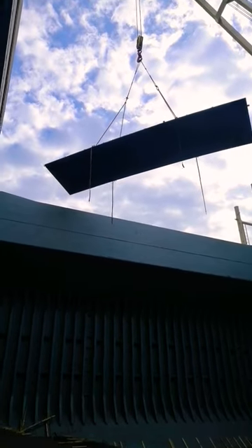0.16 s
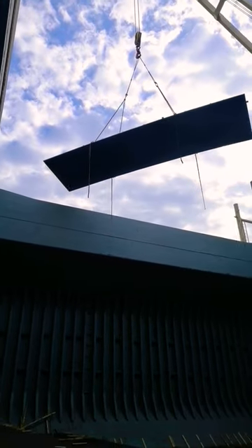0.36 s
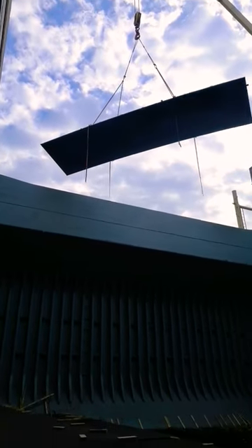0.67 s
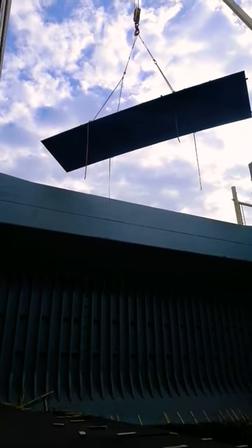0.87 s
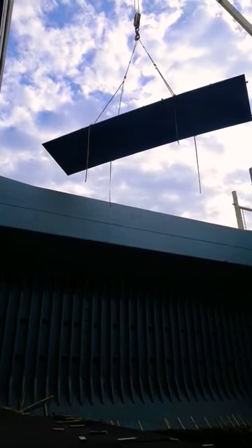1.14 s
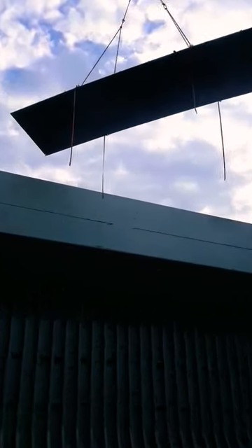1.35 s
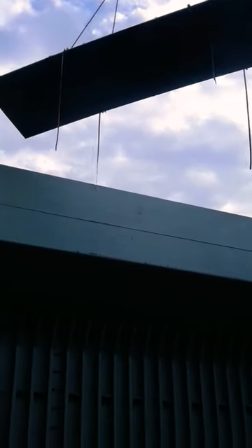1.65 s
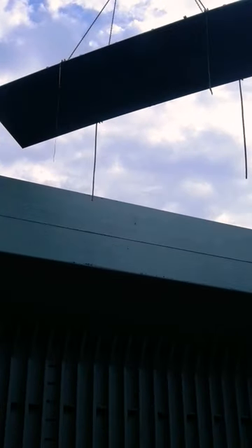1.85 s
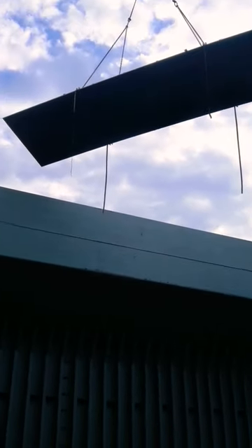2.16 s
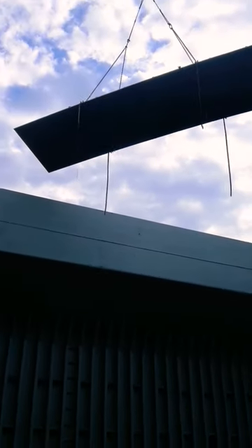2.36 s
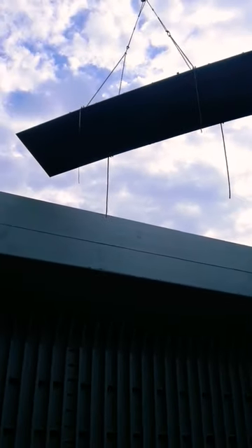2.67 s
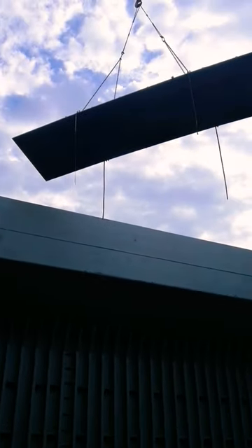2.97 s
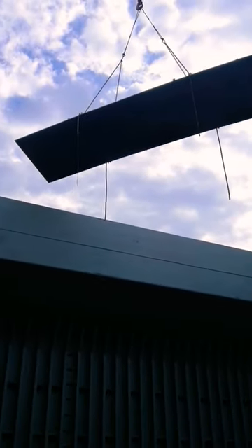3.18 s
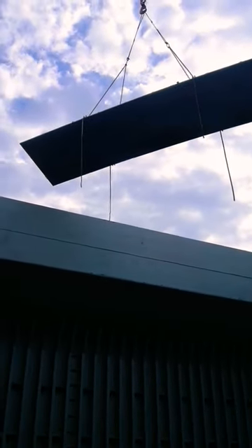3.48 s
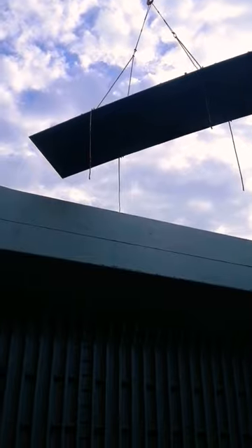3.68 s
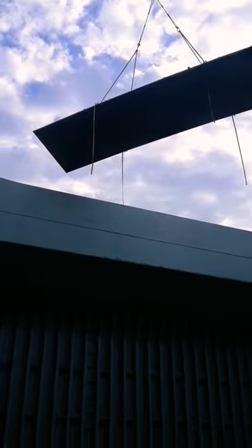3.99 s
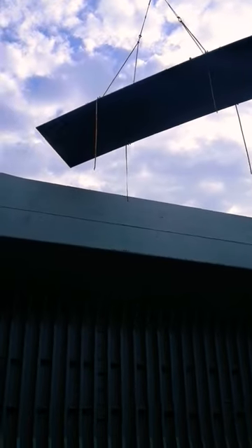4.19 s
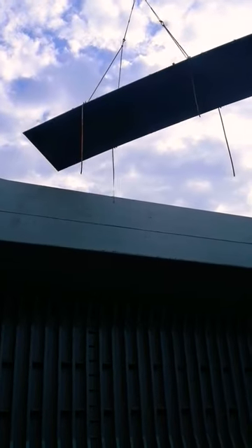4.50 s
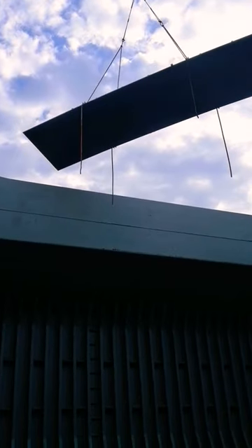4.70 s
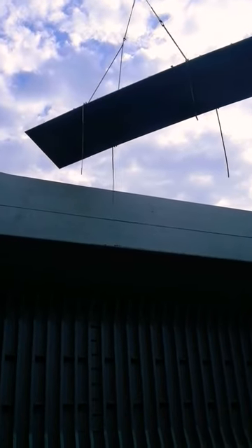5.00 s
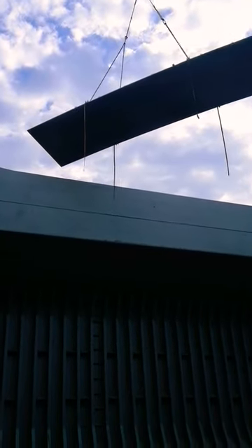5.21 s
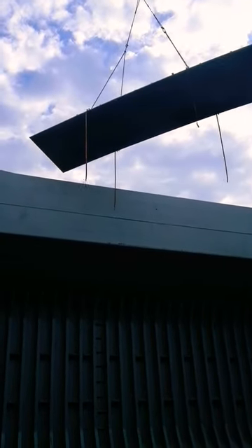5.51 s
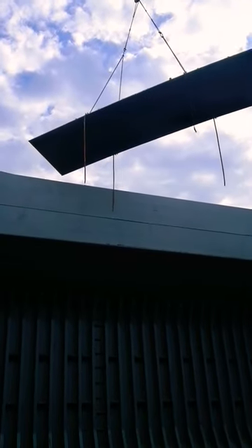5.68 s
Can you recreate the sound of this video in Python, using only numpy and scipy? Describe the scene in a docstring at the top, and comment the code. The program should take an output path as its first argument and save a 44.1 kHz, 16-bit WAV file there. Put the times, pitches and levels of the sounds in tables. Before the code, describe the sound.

Beside a ship's hull, a crane's pump motor hums evenly with a thin whine, airy rush, soft rope scrapes and a fading engine throb.

```python
"""Dock crane lifting a steel plate

Heard beside a ship's hull with a hand-held camera: one electric motor turns pumps of seven and nine pistons.
Their hums, overtones and whine are sinusoids at multiples of the shaft rate, over filtered noise for oil and air.
A far diesel throbs at its turning rate and its third multiple, amid the noise of the port's rumble and hiss.
The hoist rope rubs as resonant noise, a sheave squeaks as a rasping tone, and the slings tick as noise bursts."""
import sys
import numpy as np
from scipy import signal
from scipy.fft import rfft, irfft
from scipy.io import wavfile
from scipy.ndimage import uniform_filter1d

SR = 44100
rng = np.random.default_rng(int(sys.argv[2]) if len(sys.argv) > 2 else 0)


def generate_wav(sig):
    """Save sig (samples, or channels by samples) to the path in sys.argv[1] as 16-bit PCM at SR."""
    pcm = np.round(np.clip(np.atleast_2d(sig).T, -1, 1) * 32767).astype(np.int16)
    wavfile.write(sys.argv[1], SR, pcm)


N = 257923
TIME = np.arange(N) / SR  # seconds


def from_db(db):
    """Amplitude ratio of a level: a factor of ten for each twenty decibels."""
    return 10 ** (np.asarray(db) / 20)


def unit(x):
    """Normalises the mean power, and so the rms, to one."""
    return x / np.sqrt(np.mean(abs(x) ** 2) + 1e-20)


def follow(table):
    """Linear interpolation in time: the columns after the first, at every sample."""
    s, *columns = np.transpose(table)
    return [np.interp(TIME, s, column) for column in columns]


def across(points, hz):
    """Interpolation on a logarithmic frequency axis."""
    f, value = np.transpose(points)
    return np.interp(np.log(hz + 1), np.log(f + 1), value)


def easing(db_per_s, hold_s=0):
    """Exponential decay: a level in dB that holds at zero, then falls steadily."""
    return -db_per_s * np.maximum(TIME - hold_s, 0)


def bell(s, half_length):
    """Gaussian swell that reaches one at the given time and 1/e a half length away."""
    return np.exp(-((TIME - s) / half_length) ** 2)


def wander(rate_hz):
    """Slow random modulation of rms one: white noise under a Gaussian low-pass, down to 1/e at the rate."""
    count = 2048
    s = np.linspace(0, 2 * N / SR, count)
    hz = np.fft.rfftfreq(count, s[1])
    spectrum = rfft(rng.standard_normal(count)) * np.exp(-(hz / rate_hz) ** 2)
    return unit(np.interp(TIME, s, irfft(spectrum)))


def rotation(hz):
    """Phase is the integral of frequency: the angle of a turning shaft, from a random start."""
    return 2 * np.pi * (np.cumsum(hz) / SR + rng.random())


def ports(balance_db, lead=0):
    """Level and phase difference between two ports: complex left and right gains of mean power one."""
    left = from_db(balance_db / 2) * np.exp(1j * lead / 2)
    pair = np.array([left, 1 / left]).reshape(2, -1)
    return pair / np.sqrt(np.mean(abs(pair) ** 2, axis=0))


def diffuse(spectrum, ripple_db=0):
    """Diffuse-field coherence: noise alike at both microphone ports in the bass, unrelated in the treble."""
    # Each row: frequency in Hz, correlation of the two ports (clipped to one).
    likeness = [(30, 1.5), (50, 0.99), (110, 0.9), (190, 0.93), (360, 0.35), (640, 0), (900, 0.1),
                (1500, -0.2), (2200, 0)]
    # Each row: frequency in Hz, left minus right in dB.
    balance = [(40, -2.5), (150, -1), (270, -6.5), (480, -3.5), (900, -1), (1500, -2.5), (2500, -4),
               (5200, -2), (7000, -5), (9000, -1), (11000, 10.5), (13500, 1)]
    hz = np.fft.rfftfreq(N, 1 / SR)
    a, b = rfft(rng.standard_normal((2, N)))
    same = np.clip(across(likeness, hz), -1, 1)
    pair = np.array([a, same * a + np.sqrt(1 - same ** 2) * b])
    pair = pair * ports(across(balance, hz))
    # echoes between hull and deck ripple the spectrum
    ripple = uniform_filter1d(rng.standard_normal(pair.shape), size=300)
    ripple = unit(uniform_filter1d(ripple, size=200))
    shape = from_db(across(spectrum, hz) + ripple_db * ripple)
    return unit(irfft(pair * shape, N))


def ringing(centre_hz, width_hz):
    """Resonance by a double pole: narrow-band noise at each port, shifted to a centre that may slide."""
    r = np.exp(-np.pi * abs(width_hz) / SR)
    noise = rng.standard_normal((2, N)) + 1j * rng.standard_normal((2, N))
    band = signal.lfilter([1], np.poly([r, r]), noise)
    carrier = np.exp(1j * rotation(centre_hz * np.ones(N)))
    return unit((band * carrier).real)


def port(air_db=-57.0, air_ease_db_per_s=0.8, air_hold_s=4.3, flicker_db=0.97,
         rumble_db=-32.5, rumble_ease_db_per_s=1.33, lumps_db=1.0, boom_db=-42.5):
    """Broadband ambience as shaped noise: a far fine hiss, and a lumpy, easing rumble with a resonant boom."""
    # Spectra of the hiss and the rumble. Each row: frequency in Hz, relative level in dB per Hz.
    air_spectrum = [(2000, -12.5), (3800, 7), (4550, 3.5), (5000, 4), (5800, 5.5), (6300, 1.5), (7700, 1),
                    (8600, -5.5), (9800, -8.5), (11300, -6), (12500, -18.5), (15000, -37)]
    rumble_spectrum = [(4, -26), (10, -12), (22, -5), (34, -6), (46, -1.5), (62, 1), (85, -1), (118, 1.5),
                       (150, -7.5), (220, -15.5), (400, -53), (2000, -110)]
    air_level_db = air_db + easing(air_ease_db_per_s, air_hold_s) + flicker_db * wander(25)
    air = diffuse(air_spectrum, ripple_db=2.5) * from_db(air_level_db)
    rumble_level_db = rumble_db + easing(rumble_ease_db_per_s) + lumps_db * wander(7.9)
    rumble = diffuse(rumble_spectrum) * from_db(rumble_level_db)
    # long waves reach both ports alike
    boom = ringing(centre_hz=47.6, width_hz=18)[0] * from_db(boom_db)
    return air + rumble + boom * ports(-1.6).real


def diesel(speed_hz=34.54, sag_hz_per_s=.27, hunting=.012, firing_db=-2, lull_db=-47, waver_db=1):
    """Firing order: six cylinders fire three times a turn, slowing a little; distance makes the note surge."""
    # Surges of the firing note. Each row: start in seconds, length in seconds, level in dB before firing_db.
    surges = [(0.336, 0.25, -29.5), (0.806, 0.065, -26.5), (0.945, 0.087, -28.5), (1.517, 0.24, -29),
              (1.645, 0.049, -23), (1.864, 0.069, -30), (2.067, 0.33, -33.5), (2.176, 0.042, -26),
              (2.964, 0.8, -40), (3.588, 0.33, -33.5), (4.517, 0.26, -41), (5.597, 0.07, -33)]
    # The throb comes in waves, then sinks into the rumble. Each row: time in seconds, level in dB.
    throb_levels = [(0.04, -29.5), (0.14, -39), (0.3, -35.5), (0.75, -45), (0.9, -34), (1.08, -31.5),
                    (1.25, -39.5), (1.48, -33), (1.63, -44), (2.06, -32.5), (2.3, -43.5), (5.84, -49)]
    rise_s, fall_s = 0.034, 0.017
    angle = rotation((speed_hz - sag_hz_per_s * TIME) * (1 + hunting * wander(4.6)))
    carried = from_db(lull_db)
    for start, length, db in surges:
        envelope = np.interp(TIME - start, [0, rise_s, length, length + fall_s], [0, 1, 1, 0])
        carried = np.maximum(carried, from_db(db + firing_db) * envelope)
    note = carried * np.cos(3 * angle)
    throb = from_db(follow(throb_levels)[0] + waver_db * wander(3.2)) * np.cos(angle)
    return np.sqrt(2) * (throb + note) * ports(-1.6).real


def slings(decay_s=.0005, spread=0.62):
    """Impulsive friction: wire slings settle under the load with tiny dry ticks of decaying, band-limited noise."""
    # Each row: time in seconds, peak level in dB, centre frequency in Hz.
    ticks = [(2.7615, -41, 5500), (2.816, -36, 7000), (2.922, -32, 3700), (2.9625, -38, 5500)]
    out, size = np.zeros((2, N)), 512
    t, hz = np.arange(size) / SR, np.fft.rfftfreq(size, 1 / SR)
    for s, db, centre_hz in ticks:
        snap = rng.standard_normal((2, size)) * np.exp(-t / decay_s)
        snap = np.roll(snap, size // 2, axis=1)  # leaves room ahead for the filter
        band = np.exp(-.5 * (np.log((hz + 1) / centre_hz) / spread) ** 2)  # spread in log frequency
        tick = irfft(rfft(snap) * band)
        start = round(s * SR) - size // 2
        out[:, start:start + size] += from_db(db) * tick / abs(tick).max()
    return out


def sheave(squeak_hz=7340, waver=.003, rasp=.8, rasp_width_hz=260, flutter_db=0.5, balance_db=-6):
    """Friction-driven oscillation: a dry sheave sings one thin, unsteady note with a rasp around it."""
    # The squeak swells in and tails off. Each row: time in seconds, level in dB.
    squeak_levels = [(3.05, -89), (3.22, -70), (3.4, -71), (3.5, -62), (3.59, -67), (3.7, -60.5),
                     (3.88, -71), (4.15, -81), (4.35, -95)]
    hz = squeak_hz * (1 + waver * wander(18))
    note = np.sqrt(2) * np.cos(rotation(hz)) + rasp * ringing(hz, rasp_width_hz)
    level_db = follow(squeak_levels)[0] + flutter_db * wander(30)
    return unit(note) * from_db(level_db) * ports(balance_db).real


def hoist(waver=.01, rough_db=1.5):
    """Friction exciting a resonance: each rub of the running rope swells and dies, sliding as the contact
    moves; two broad swells of hiss come and go among them."""
    # Rubs on drum and sheaves, and two broad swells of the hiss (the rows 4000 Hz wide). Each row: time of the
    # loudest in seconds, # half length in seconds, centre frequency in Hz, glide in Hz per second, width of
    # each pole in Hz, level in dB.
    rubs = [(0.3, 1.1, 3950, 0.5, 190, -62), (0.5, 0.6, 1124, 0, 250, -47), (.36, 0.32, 2880, -2, 170, -58),
            (0.548, 0.55, 2614, -200, 398, -48.5), (1.28, 0.14, 5870, -0.5, 4000, -63.5),
            (1.387, 0.14, 3860, -200, 100, -62), (1.51, .06, 1790, 0.5, 250, -49),
            (1.782, .12, 1816, 0, 250, -48), (2.02, 0.16, 2620, 0, 250, -53.5),
            (2.94, .13, 2720, -1, 350, -54), (2.378, 0.2, 2433, -350, 240, -48.5),
            (2.6, .14, 2930, 599.5, 400, -57.5), (3.62, 0.24, 1760, 0, 402, -46.5),
            (4.132, 0.07, 1470, 300.5, 151, -47), (4.252, 0.076, 1774, 0.5, 300, -47),
            (4.653, 0.15, 5570, -1.5, 4000, -60), (4.732, 0.14, 6940, -1, 50.3, -73)]
    out = np.zeros((2, N))
    contact, grip_db = 1 + waver * wander(6), rough_db * wander(40)
    for s, length, hz, glide, width, db in rubs:
        centre_hz = (hz + glide * np.clip(TIME - s, -length, length)) * contact
        out += ringing(centre_hz, width) * from_db(db + grip_db) * bell(s, length)
    return out


def valves(shaft, piston_depth=0.12, shaft_depth=0.074, base_db=-49.5, lift_db=2, peak_s=2.6, half_s=2,
           swell_db=1.08):
    """Amplitude-modulated flow noise: oil spurts with each stroke of nine pistons, unevenly over a turn."""
    # Oil hissing through the valves. Each row: frequency in Hz, relative level in dB per Hz.
    valve_spectrum = [(100, -48.5), (900, -24.5), (1600, -1), (2200, 1.5), (2600, 0), (2900, -4.5),
                      (3200, -9), (3600, -14), (4500, -21.5), (7000, -41), (12000, -87.5)]
    strokes = np.cos(9 * shaft) + np.cos(18 * shaft)
    spurts = 1 + piston_depth * strokes + shaft_depth * np.cos(shaft)
    # the hiss swells broadly in the middle of the lift
    level_db = base_db + lift_db * bell(peak_s, half_s) + swell_db * wander(37)
    return diffuse(valve_spectrum, ripple_db=2.6) * spurts * from_db(level_db)


def rush(base_db=-31, hold_s=2.75, ease_db_per_s=0.54, swell_db=0.95):
    """Turbulence noise: cooling air and machine-house drone hold, then ease as the camera turns away."""
    # The rush of air and oil. Each row: frequency in Hz, relative level in dB per Hz.
    rush_spectrum = [(60, -50.5), (150, -6), (200, -2), (290, 2), (340, -4), (400, -4), (480, -10),
                     (660, -9), (900, -15.5), (1200, -18), (1700, -21.5), (2100, -27), (4000, -55),
                     (10000, -88)]
    level_db = base_db + easing(ease_db_per_s, hold_s) + swell_db * wander(21)
    return diffuse(rush_spectrum, ripple_db=1.1) * from_db(level_db)


def whine(shaft, gain_db=0, fading=0.3, fading_hz=1.4, flutter=0.054):
    """Multipath fading: higher orders reach each port by many echoes off the steel; shorter waves fade more."""
    # Fainter tones of pumps and shaft. Each row: multiple of the shaft rate, level in dB,
    # left minus right in dB, left lead in radians, drift in dB per second.
    whine_orders = [(8, -46, -4, -.3, 0), (15, -58, 4, .5, 0), (17, -57, -2, .8, 0), (23, -60, 0, .5, 0),
                    (26, -60, 8, 0, 0), (29, -63, 0, 0, 0), (35, -54, -2, 2, 0), (42, -57.5, 0, -1.1, -.5),
                    (49, -66, -2, 0, 0), (56, -65, -3, 0, 0), (58, -69, -3, 1, 0), (69, -67, -5, -1.2, .4),
                    (72, -67, -7, .3, 0), (81, -67, -8, -2, -.7), (99, -72, -5, -.6, -2)]
    out = np.zeros((2, N))
    for order, db, balance_db, lead, drift in whine_orders:
        depth = fading * np.sqrt(order / 20)
        echoes = np.array([wander(fading_hz) + 1j * wander(fading_hz) for _ in range(2)])
        swell = unit(from_db(drift * TIME) * (1 + depth * echoes) * (1 + flutter * wander(8.6)))
        tone = np.exp(1j * (order * shaft + 2 * np.pi * rng.random()))
        out += from_db(db + gain_db) * (swell * tone * ports(balance_db, lead)).real
    return np.sqrt(2) * out


def overtones(shaft, gain_db=-0.21, flutter=0.115, sway_db=0.57, path_rad=0.45):
    """Fourier harmonics of the pressure pulses' sharp edges, fluttering in the moving air."""
    # They wax and wane as the camera moves through their standing waves. Each row: multiple of the shaft rate,
    # then a list of time in seconds, level in dB before gain_db, left minus right in dB, left lead in radians.
    overtone_orders = [(14, [(0.0, -38.0, -7.0, 0.3), (0.5, -33.5, -10.0, 0.3), (0.9, -39.0, -12.0, -0.4),
                       (1.45, -33.5, -16.0, 0.2), (1.9, -36.0, -9.0, 0.4), (2.8, -31.0, -9.0, 0.2),
                       (3.6, -36.5, -15.0, 0.9), (4.5, -37.0, -5.0, 1.0), (4.8, -34.5, -10.0, 0.5),
                       (5.65, -34.5, -3.0, 0.6), (5.84, -33.5, -10.0, 0.6)]), (21, [(0.0, -38.5, -3.0, 0.5),
                       (1.2, -38.5, 1.0, 0.6), (1.5, -40.0, 8.0, 0.6), (1.8, -36.0, -1.0, 0.2),
                       (2.2, -38.0, -1.0, 0.3), (2.75, -36.0, 1.0, 0.2), (3.3, -38.5, 3.0, 0.2),
                       (3.5, -37.0, 2.0, 0.2), (4.5, -40.5, 1.0, -0.3), (4.7, -42.5, 9.0, -0.5),
                       (4.95, -40.5, 2.0, -0.3), (5.84, -43.0, 4.0, -1.2)]), (28, [(0.0, -41.5, -18.0, 1.0),
                       (0.35, -46.0, -1.0, 1.7), (0.65, -41.5, -15.0, 1.7), (1.05, -43.0, -7.0, 1.4),
                       (1.3, -49.0, -1.0, 1.3), (1.5, -45.0, -2.0, 1.8), (2.55, -41.5, -9.0, 1.3),
                       (3.1, -51.5, -15.0, 1.1), (3.35, -43.0, -7.0, 0.9), (3.9, -48.5, -14.0, 1.4),
                       (4.35, -39.0, -27.0, 1.1), (4.8, -40.0, -11.0, 1.5), (5.2, -44.0, -14.0, 2.5),
                       (5.84, -41.5, -6.0, 2.7)]), (18, [(0.0, -32.0, 8.0, 0.3), (0.35, -35.5, 12.0, -0.4),
                       (0.85, -33.5, 3.0, -0.4), (1.2, -37.0, 1.0, -0.9), (1.65, -32.5, 6.0, -0.3),
                       (2.1, -35.0, -1.0, -0.5), (2.45, -37.5, 2.0, -1.2), (3.2, -38.5, 5.0, -0.3),
                       (3.55, -35.5, 5.0, -0.1), (3.95, -43.0, 3.0, -0.7), (4.1, -39.5, -1.0, -0.5),
                       (4.7, -40.0, 3.0, 0.1), (4.85, -37.0, 3.0, 0.1), (5.84, -37.5, 5.0, 0.0)]),
                       (27, [(0.0, -48.0, -2.0, -1.1), (0.4, -44.0, 4.0, -0.9), (0.65, -47.0, -9.0, -2.0),
                       (0.8, -62.5, 0.0, -2.6), (1.1, -47.0, 9.0, -0.8), (1.3, -47.0, -4.0, 0.2),
                       (1.55, -42.5, 5.0, 0.8), (1.85, -50.5, -4.0, 2.1), (2.35, -40.5, 1.0, 1.0),
                       (2.95, -41.0, 4.0, 0.4), (3.95, -41.0, -2.0, 1.0), (4.8, -49.0, -6.0, 0.8),
                       (5.84, -50.0, -1.0, -0.3)]), (36, [(0.0, -40.0, 15.0, 2.5), (0.55, -42.0, 17.0, 2.6),
                       (1.25, -46.5, 7.0, 3.5), (2.25, -44.0, 15.0, 1.1), (2.85, -49.0, 5.0, 0.7),
                       (3.15, -45.0, 5.0, 1.0), (3.6, -48.0, 3.0, -1.1), (4.05, -53.5, -5.0, -0.7),
                       (4.3, -50.0, 11.0, -2.8), (4.9, -44.5, 4.0, -3.2), (5.84, -44.0, 6.0, -3.6)]),
                       (45, [(0.0, -57.0, -17.0, 7.0), (0.75, -67.0, 8.0, 5.8), (1.45, -55.5, 0.0, 2.8),
                       (1.55, -63.0, 4.0, 3.0), (3.05, -50.5, -4.0, 1.6), (3.6, -51.5, -4.0, 2.6),
                       (5.5, -54.5, -9.0, 2.4), (5.84, -57.0, 1.0, 2.6)]), (54, [(0.0, -58.5, 1.0, -2.2),
                       (0.2, -53.5, -6.0, -2.0), (0.55, -56.5, 3.0, -2.5), (1.4, -47.5, -14.0, -1.8),
                       (1.65, -57.5, 5.0, -2.8), (2.05, -47.5, -5.0, -2.7), (2.2, -52.5, -6.0, -2.6),
                       (2.55, -46.5, -9.0, -2.9), (3.1, -48.5, -14.0, -3.2), (3.95, -50.5, -9.0, -6.1),
                       (4.25, -52.5, -3.0, -8.5), (4.6, -52.5, -5.0, -6.9), (5.84, -53.0, -7.0, -6.4)]),
                       (63, [(0.0, -64.5, -3.0, 1.5), (1.05, -70.5, 3.0, 4.2), (1.25, -58.0, 6.0, 3.8),
                       (1.65, -70.5, -2.0, 3.0), (3.65, -56.5, -7.0, 4.3), (4.0, -60.0, -10.0, 3.5),
                       (4.7, -52.5, -5.0, 2.9), (5.05, -50.5, -22.0, 2.3), (5.84, -53.0, -17.0, 0.3)])]
    out = np.zeros((2, N))
    for order, table in overtone_orders:
        level_db, balance_db, lead = follow(table)
        air = np.array([wander(27) + 1j * wander(7.3) for _ in range(2)])
        # the echo paths shift as the camera moves
        path = 2 * np.pi * rng.random() + path_rad * wander(0.54)
        tone = np.exp(1j * (order * shaft + path))
        gain = from_db(level_db + gain_db + sway_db * wander(2.0))
        out += gain * (tone * (ports(balance_db, lead) + flutter * air)).real
    return np.sqrt(2) * out


def pump(stroke, table, gain_db, lead, flutter, sway_db):
    """Piston-passing tone: one pressure pulse per piston a turn makes a hum that flutters and sways slightly."""
    level_db, balance_db = follow(table)
    pair = ports(balance_db, lead)
    pair = pair / abs(pair.mean(0))  # the level is that of the two ports' average
    tone = np.exp(1j * stroke) * (1 + flutter * (wander(12.0) + 1j * wander(37)))
    gain = from_db(level_db + gain_db + sway_db * wander(5.4))
    return np.sqrt(2) * gain * (tone * pair).real


def scene():
    """Superposition of all sources; both pumps share one shaft, barely wavering under the steady load."""
    # Each pump's hum as the camera moves through its standing waves.
    # Each row: time in seconds, level in dB before gain_db, left minus right in dB.
    seven_pistons = [(0, -27.5, 0), (0.8, -27.5, 2.5), (1.4, -30.5, -5.5), (1.9, -29, -7.5),
                     (2.4, -32.5, -7), (2.7, -30.5, -2), (2.86, -36, 1), (3.1, -30, -5),
                     (3.85, -28.5, -7.5), (4.85, -31.5, -10), (5.84, -34, -8)]
    nine_pistons = [(0, -30, 18), (0.55, -24.5, 13), (1.05, -25, 4), (1.3, -27, -19), (1.85, -30, -11),
                    (2.1, -27, -13), (2.45, -30, -16), (3.05, -24.5, -12.0), (3.35, -30, -16),
                    (4.15, -22, -10), (4.651, -26.5, -14.5), (5.84, -19.5, -8.5)]
    shaft_hz = 29.714
    shaft = rotation(shaft_hz * (1 + .0005 * wander(1)))
    seven = pump(7 * shaft, seven_pistons, gain_db=0.0, lead=-0.52, flutter=0.059, sway_db=0.86)
    nine = pump(9 * shaft, nine_pistons, gain_db=0.06, lead=-0.017, flutter=0.055, sway_db=0.94)
    hum = seven + nine + overtones(shaft) + whine(shaft)
    background = port() + diesel()
    rigging = slings() + sheave() + hoist()
    return background + rigging + valves(shaft) + rush() + hum


def record(dry, fade_s=0.00029, edge_hz=15000):
    """Band limitation by a linear-phase low-pass, after a very short squared-sine fade-in against a click."""
    fade_in = np.sin(np.pi / 2 * np.minimum(TIME / fade_s, 1)) ** 2
    low_pass = signal.firwin(511, edge_hz, window=("kaiser", 9), fs=SR)
    return signal.oaconvolve(dry * fade_in, low_pass[None], "same", axes=1)


dry = scene()
out = record(dry)
generate_wav(out)
```